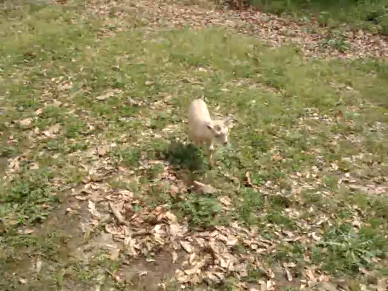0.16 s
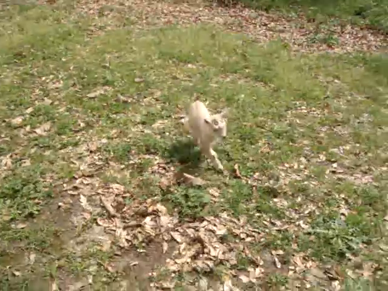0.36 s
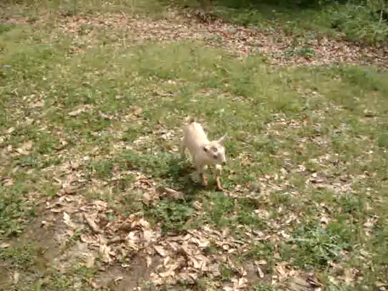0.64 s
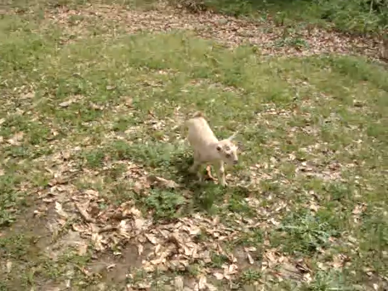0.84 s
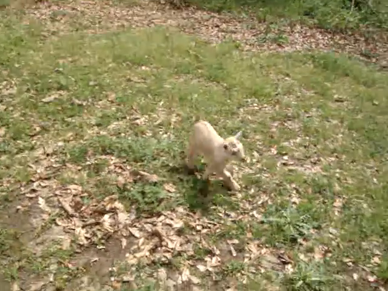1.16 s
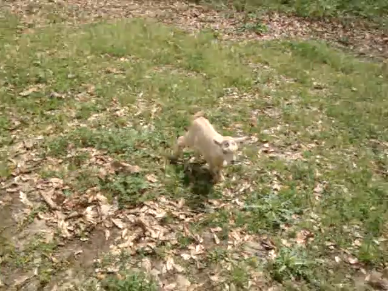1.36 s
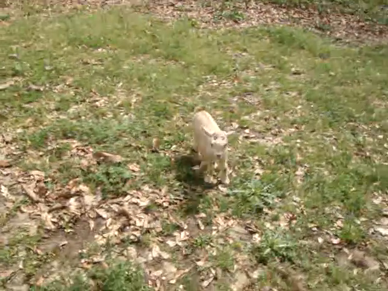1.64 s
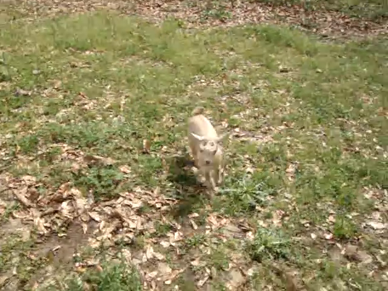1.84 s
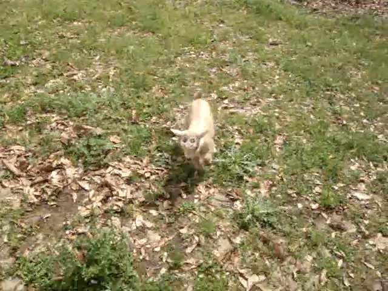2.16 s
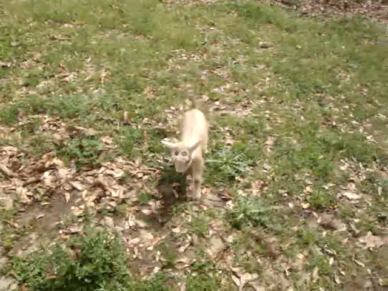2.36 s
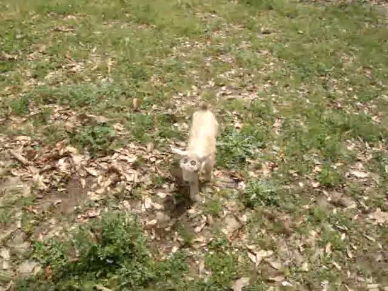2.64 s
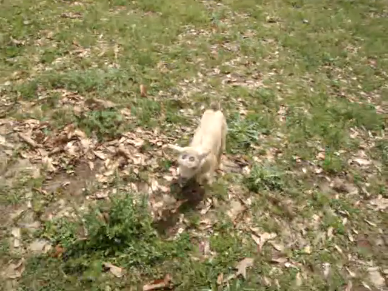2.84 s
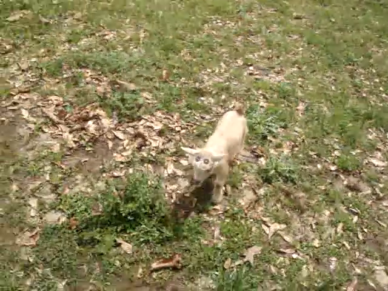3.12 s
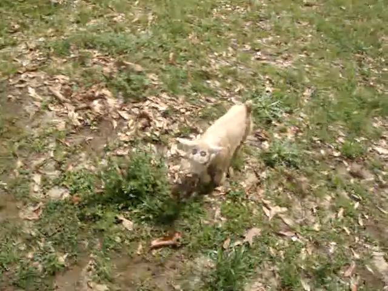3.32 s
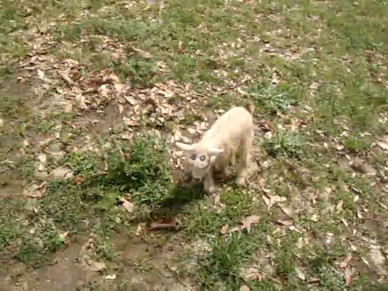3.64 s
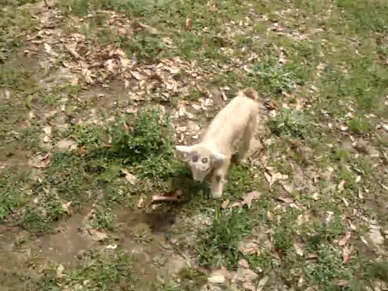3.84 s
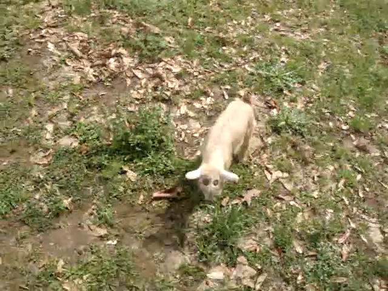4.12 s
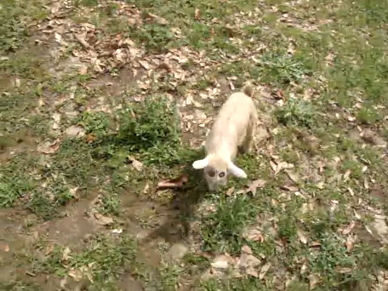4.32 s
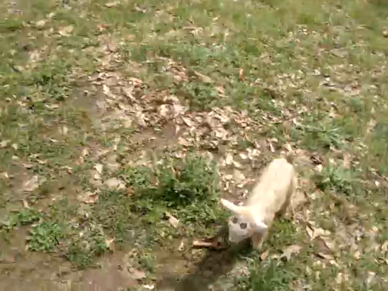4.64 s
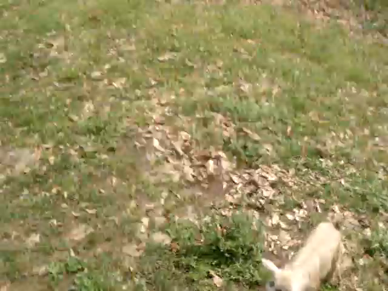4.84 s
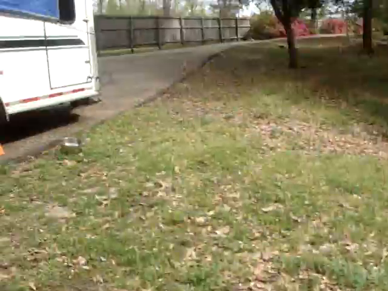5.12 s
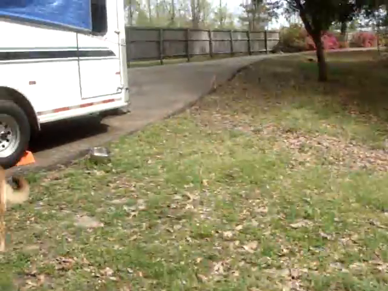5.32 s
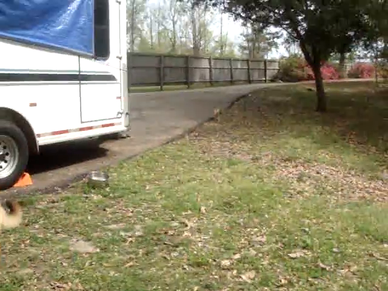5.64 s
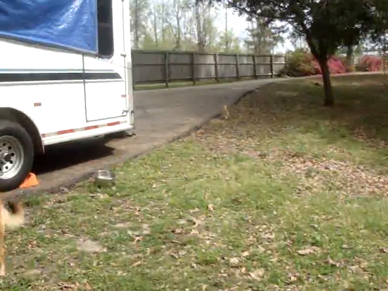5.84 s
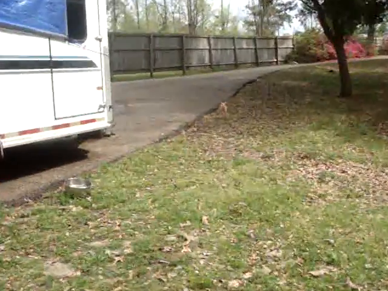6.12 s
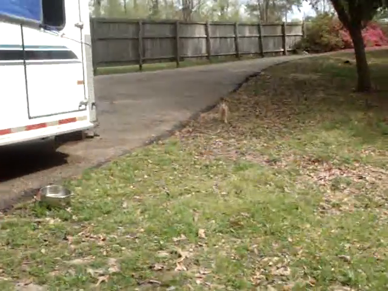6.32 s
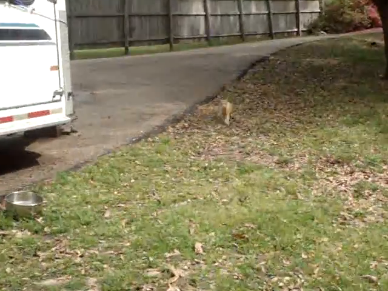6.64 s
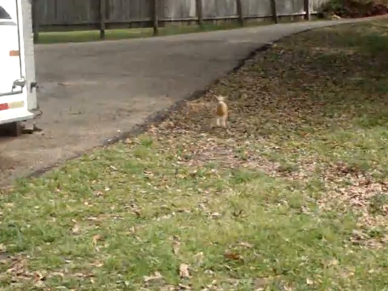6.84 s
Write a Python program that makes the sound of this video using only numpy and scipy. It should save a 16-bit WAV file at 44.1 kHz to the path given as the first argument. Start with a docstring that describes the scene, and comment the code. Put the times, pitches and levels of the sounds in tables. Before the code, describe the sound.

Outdoor yard with light hiss: small hooves crackle leaves, a rooster gives one raspy crow, a songbird whistles repeatedly, another rooster answers faintly far away.

```python
"""A farmyard heard through a camera's microphone: outdoor air, a distant engine of two partials, pulsing hiss.
From the start a goat kid steps through dry leaves close by (tiny cracks and snaps of filtered noise)
and a songbird gives stray whistled notes. Then a rooster crows once: harmonics torn by rasp and flutter.
The songbird whistles slurred notes, then a falling run, each thrown back by the yard (sweeping sines).
Near the end a second rooster answers from far off, as one wavering partial with faint overtones."""
import sys
import numpy as np
from scipy import signal
from scipy.fft import rfft, irfft, next_fast_len
from scipy.io import wavfile

SR = 44100
rng = np.random.default_rng(int(sys.argv[2]) if len(sys.argv) > 2 else 0)


def generate_wav(sig):
    """Save sig (samples, or channels by samples) to the path in sys.argv[1] as 16-bit PCM at SR."""
    pcm = np.round(np.clip(np.atleast_2d(sig).T, -1, 1) * 32767).astype(np.int16)
    wavfile.write(sys.argv[1], SR, pcm)


N = 307818
TIME = np.arange(N) / SR
EDGE_HZ = 10150  # upper band limit of the camera
CLEAN_DEPTH = 0.19  # flutter depth, 0-1, of the rooster's settled voice


def gain_of(db):
    """Decibels to gain."""
    return 10 ** (np.asarray(db) / 20)


def evened(x):
    """Scales to rms 1."""
    return x / np.sqrt(np.mean(abs(x) ** 2) + 1e-20)


def read(points, hz):
    """Reads a table at the frequencies hz, joined on a log-frequency axis."""
    f, value = np.transpose(points)
    return np.interp(np.log(hz + 1), np.log(f + 1), value)


def follow(rows, t):
    """Each column of a curve table at the times t."""
    s, *columns = np.transpose(rows)
    return [np.interp(t, s, column) for column in columns]


def add(mix, s, sound):
    """Mixes a sound in at s seconds, cutting whatever falls outside."""
    start = round(s * SR)
    sound = sound[max(-start, 0):]
    part = mix[max(start, 0):][:len(sound)]
    part += sound[:len(part)]


def coloured(x, points):
    """Filters x by a spectrum table, then scales it to rms 1."""
    hz = np.fft.rfftfreq(len(x), 1 / SR)
    return evened(irfft(rfft(x) * gain_of(read(points, hz)), len(x)))


def wander(size, hz):
    """Smooth random drift of about rms 1, with up to about hz changes a second."""
    length = next_fast_len(max(size, SR))
    f = np.fft.rfftfreq(length, 1 / SR)
    spectrum = rfft(rng.standard_normal(length)) / (1 + (f / hz) ** 4)
    return evened(irfft(spectrum, length))[:size]


def faded(t, fade):
    """A gate over the times t with soft ends, fade seconds each."""
    return np.clip(np.minimum(t - t[0], t[-1] - t) / fade, 0, 1)


def ramp(t, middle, length):
    """Goes from 0 to 1 over the given length."""
    return np.clip((t - middle) / length + .5, 0, 1)


def bell(t, middle, length):
    """A smooth bump of height 1."""
    return np.exp(-(2 * (t - middle) / length) ** 2)


def outdoor_air():
    """Broad outdoor noise whose level swells a little at random."""
    # Each row: frequency in Hz, relative density in dB per Hz.
    air_spectrum = [(15, -61.5), (25, -15), (90, -4), (172, 0.5), (499, 0), (666, -2), (1880, -6.5),
                    (3280, -6.5), (5710, -11.5), (7440, -12.5), (8000, -8), (10400, -51.5), (17600, -120)]
    level_db, swell_db = -50.5, 0.7
    swell = gain_of(level_db + swell_db * wander(N, 3.2))
    return swell * coloured(rng.standard_normal(N), air_spectrum)


def distant_engine():
    """Two low partials share an uneven turning speed and waver separately in level."""
    # Level over time. Each row: time in seconds, relative level in dB.
    engine_level = [(0, -81), (1, -59.5), (4.7, -67), (5.1, -56.5), (5.5, -59.5), (6.3, -49.5), (6.98, -56)]
    # Partials of the drone. Each row: mean frequency in Hz, mean relative level in dB.
    engine_lines = [(91.5, -16), (183, -5.5)]
    turns = np.cumsum(1 + 0.0051 * wander(N, 5.5)) / SR
    drone = np.zeros(N)
    for hz, db in engine_lines:
        drone += gain_of(db + 2.1 * wander(N, 3.3)) * np.sin(2 * np.pi * hz * turns)
    return np.sqrt(2) * gain_of(follow(engine_level, TIME)[0]) * drone


def leaves(cracks_per_s=2500, spread_db=3.0):
    """Steps crush a mass of tiny cracks out of dry leaves, and a few sharp snaps."""
    # Spectrum of the crackle. Each row: frequency in Hz, relative density in dB per Hz.
    leaf_spectrum = [(300, -37), (1000, -24), (2000, -6.5), (3500, -4), (6000, -4), (10000, -8.5)]
    # Leaves and grass brushed by steps. Each row: start in seconds, length in seconds, level in dB.
    rustles = [(0.414, 0.048, -42), (0.85, 0.089, -49.5), (0.941, 0.18, -46), (1.275, 0.075, -45.5),
               (1.405, 0.11, -44.5), (1.49, 0.27, -45), (2.402, 0.028, -41), (3.163, 0.039, -43),
               (3.678, 0.033, -42.5)]
    # Leaves snapping underfoot. Each row: start in seconds, peak level in dB, nominal centre in Hz.
    snaps = [(0.319, -28, 8660), (0.456, -19.5, 2900), (0.469, -21.5, 7120), (0.48, -20.5, 8620),
             (0.862, -26, 4860), (0.876, -21, 5000), (1.023, -30, 3070), (1.26, -25, 2920),
             (1.481, -27, 2970), (4.58, -25.5, 7700), (5.653, -29.5, 1440), (6.791, -27, 3340)]
    snap_decay_s, crumble_decay_s, crumble_db = 0.0012, 0.01, -22  # a snap leaves a faint crumbling

    sizes = gain_of(spread_db * np.minimum(rng.exponential(1, N), 4))
    cracks = sizes * (rng.random(N) < cracks_per_s / SR)
    crackle = coloured(cracks * rng.choice([-1, 1], N), leaf_spectrum)
    pressure, out = np.zeros(N), np.zeros(N)
    for s, length, db in rustles:
        add(pressure, s, gain_of(db) * signal.windows.tukey(int(length * SR), .5))

    t = np.arange(2048) / SR
    decay = np.exp(-t / snap_decay_s) + gain_of(crumble_db) * np.exp(-t / crumble_decay_s)
    for s, db, hz in snaps:
        band = signal.butter(2, [hz * 0.43, min(hz * 2.17, EDGE_HZ)], "band", fs=SR)
        snap = signal.lfilter(*band, rng.standard_normal(len(t)) * decay)
        add(out, s, gain_of(db) * snap / abs(snap).max())
    return out + pressure * crackle


def yard(x, wet_db, early=3.4, early_decay=0.0039):
    """Leaves and fences scatter a quick spray of echoes and a thin tail, each band dying at its own speed."""
    # Each row: frequency in Hz, time in seconds for the tail to fall by 60 dB.
    decay_times = [(300, 0.89), (1300, 1.07), (3500, 0.67), (9000, 0.41)]
    t = TIME[:SR]
    taps = rng.standard_normal(SR) * (rng.random(SR) < 2000 / SR)  # about 2000 echoes a second
    taps = taps * (1 + early * np.exp(-t / early_decay))
    hz, t, bands = signal.stft(taps, SR, nperseg=256)
    decay = gain_of(-60 * t / read(decay_times, hz)[:, None])
    tail = signal.istft(bands * decay, SR, nperseg=256)[1]
    return x + gain_of(wet_db) * signal.fftconvolve(x, tail / np.linalg.norm(tail))[:N]


def far_rooster(rows, overtone_db=-10):
    """Distance leaves one wavering partial and traces of its overtones."""
    t = np.arange(rows[0][0], rows[-1][0], 1 / SR)
    hz, db = follow(rows, t)
    phase = 2 * np.pi * np.cumsum(hz * (1 + 0.0042 * wander(len(t), 60))) / SR
    voice = sum(gain_of(overtone_db * (k - 1)) * np.sin(k * phase) for k in range(1, 4))
    return t[0], np.sqrt(2) * gain_of(db) * voice * faded(t, 0.018)


def songbird():
    """Slightly unsteady whistles follow their note shapes; hard surfaces repeat each sweep."""
    # Five note shapes. Each row: seconds from the note's time, pitch in Hz, relative level in dB.
    slur_shape = [(-.125, 1708, -23), (-.07, 1899, -12), (-.025, 2130, -12.5), (-.005, 2318, -20.5),
                  (0, 3900, -33), (.008, 3650, -3.5), (.03, 3600, -15), (.05, 3156, -4), (.064, 2750, -23)]
    rise_shape = [(-.08, 1293, -19.5), (-.04, 1493, -19.5), (.03, 1870, -24)]
    fall_shape = [(.01, 6900, -19), (.03, 5600, -10), (.054, 4500, -4), (.066, 3400, 2), (.077, 2400, -4),
                  (.084, 2000, -16)]
    chip_shape = [(0, 8130, -1), (.008, 7500, -4), (.017, 6750, 6.5), (.028, 6380, -10)]
    peep_shape = [(0, 3250, -12), (.014, 2916, 0.5), (.08, 2780, -13)]
    # When the slurs, chips and peeps sound. Each row: time in seconds, relative level in dB.
    slurs = [(3.62, -48.5), (4.126, -41), (4.423, -39.5), (4.743, -39.5), (5.032, -37.5)]
    chips = [(1.974, -48), (4.992, -58), (5.248, -47.5)]
    peeps = [(.8, -54.5)]
    # Evenly paced falling notes. Each row: first note in seconds, count of notes, relative level in dB.
    fall_runs = [(.062, 1, -47.5), (5.251, 7, -43.5)]
    # Repeats from hard surfaces. Each row: delay in seconds, level against the direct song in dB.
    echoes = [(.005, -3), (.012, -6), (.038, -4)]
    fall_period_s = 0.2388

    falls = []
    for first, count, run_db in fall_runs:
        falls += [(first + k * fall_period_s, run_db) for k in range(count)]
    # a soft rise leads in each falling note
    phrases = ((slur_shape, slurs), (rise_shape, falls), (fall_shape, falls),
               (chip_shape, chips), (peep_shape, peeps))
    song = np.zeros(N)
    for shape, notes in phrases:
        t = np.arange(shape[0][0], shape[-1][0], 1 / SR)
        hz, db = follow(shape, t)
        for s, level_db in notes:
            unsteady_hz = hz * (1 + 0.011 * wander(len(t), 200))
            whistle = np.sin(2 * np.pi * np.cumsum(unsteady_hz) / SR)
            add(song, s + t[0], np.sqrt(2) * gain_of(level_db + db) * whistle * faded(t, 0.00067))
    heard = song.copy()
    for delay, db in echoes:
        add(heard, delay, gain_of(db) * song)
    return heard


def syrinx(t, hz, rasp, levels, flutter=0):
    """Harmonics that flutter and are smeared by rasp, with puffs of torn air; gives the voice and its phase."""
    # Air torn by uneven cycles. Each row: frequency in Hz, relative density in dB per Hz.
    torn_spectrum = [(350, -17), (600, -13), (1200, 4.5), (1900, -5), (2300, -16.5), (2900, -10),
                     (4500, -19.5), (9000, -18)]
    # upper harmonics: level, fall per harmonic number and slow unevenness, all in dB
    upper_db, upper_slope_db, upper_patchy_db = -5, 1.0, 4
    fundamental_flutter = 0.63  # share of the flutter that reaches the fundamental's level

    size = len(t)
    rasp, flutter = np.clip(rasp, 0, 1), np.clip(flutter, 0, 1)
    shake = 2 * np.pi * np.cumsum(31 + 8 * wander(size, 27.0)) / SR  # about 31 Hz
    vibrato = 0.02 * flutter * np.sin(shake)
    jitter = (0.0017 + 0.045 * rasp) * wander(size, 130)
    phase = 2 * np.pi * np.cumsum(hz * (1 + vibrato + jitter)) / SR
    voice = np.zeros(size)
    for k in range(1, 14):
        if k <= len(levels):
            gain = gain_of(levels[k - 1])
        else:  # weak, patchy upper harmonics
            patches = upper_patchy_db * wander(size, 13)
            gain = gain_of(np.minimum(*levels[-2:]) + upper_db - upper_slope_db * k + patches)
        depth = flutter * (fundamental_flutter if k == 1 else 1)
        throb = evened(1 + depth * np.cos(shake + k * np.pi / 2 + wander(size, 19)))
        scatter = evened(wander(size, 130) + 1j * wander(size, 170))  # uneven cycles smear each line
        voice += gain * throb * ((1 + 0.78 * rasp * scatter) * np.exp(1j * k * phase)).real
    torn_air = coloured(rng.standard_normal(size) * (1 + np.cos(phase)), torn_spectrum)  # one puff a cycle
    return voice + gain_of(np.max(levels, axis=0) - 0.5) * rasp * torn_air, phase


def short_syllable(leap_at, lead_s, hold_s, release_s, db):
    """Starts low, leaps up with a rasp, arches and dies away, while the syrinx's other side stays low."""
    # Harmonics 1-4. Each row: relative level in dB, change in the low register in dB, release in dB per s.
    syllable_harmonics = [(-2, -8, 180), (-1, -3.5, 48), (-16, 0, 90), (-25.5, -7, 90)]
    # The side that stays low. Each row: mean frequency in Hz, relative level in dB.
    low_lines = [(1065, -12), (1835, -15.5)]
    low_release_db_per_s = 68
    low_hz, high_hz, arch_hz, leap_s = 521.3, 625.3, 26.94, 0.013
    rasp_low, rasp_ends, rasp_middle = 0.3, 0.42, 0.24  # 0-1; the rasp clears in mid-hold

    t = np.arange(-lead_s, hold_s + release_s, 1 / SR)
    high = ramp(t, 0, leap_s)
    arch = np.sin(np.pi * np.clip(t / hold_s, 0, 1))
    released = np.maximum(t - hold_s, 0)
    hz = low_hz + high * (high_hz - low_hz) + arch_hz * arch
    rasp = rasp_low + high * (rasp_ends - rasp_low) + arch * (rasp_middle - rasp_ends)
    levels = [db + own_db + low_db * (1 - high) - fall * released
              for own_db, low_db, fall in syllable_harmonics]
    voice, _ = syrinx(t, hz, rasp, levels)
    low_phase = 2 * np.pi * np.cumsum(1 + 0.017 * wander(len(t), 110)) / SR
    low_side = sum(gain_of(line_db) * np.cos(line_hz * low_phase) for line_hz, line_db in low_lines)
    return leap_at + t, voice + gain_of(db - low_release_db_per_s * released) * low_side


def long_note():
    """Breaks in with a rasp, flutters, then holds a clean tone out of which single overtones ring."""
    # Pitch. Each row: time in seconds, frequency in Hz.
    note_pitch = [(2.228, 566), (2.253, 653), (2.302, 688.5), (2.502, 662), (2.7, 663.4), (2.75, 637.4),
                  (2.9, 658.3), (3.3, 657), (3.602, 643.4), (3.777, 614.5)]
    # Fundamental, then the second harmonic, which carries the crow. Each row: time in seconds, level in dB.
    first_level = [(2.23, -48), (2.238, -39), (2.744, -33), (2.796, -39), (3.156, -41), (3.25, -52),
                   (3.332, -45), (3.396, -53), (3.576, -40.5), (3.64, -50), (3.744, -35.5), (3.77, -36)]
    second_level = [(2.23, -42), (2.336, -31), (2.616, -34), (2.666, -29.5), (2.882, -37), (2.962, -28.5),
                    (3.056, -33), (3.112, -41.5), (3.242, -32.5), (3.314, -38), (3.378, -30.5), (3.46, -39),
                    (3.534, -27.5), (3.594, -45), (3.64, -49), (3.678, -24.5), (3.77, -34)]
    # Harmonics 3 and 4 sink steadily. Each row: starting level in dB, fall in dB per second.
    upper_levels = [(-49.5, 8.5), (-52.5, 5.5)]
    # Overtones that the throat picks out for a moment, each at the harmonic nearest its frequency.
    # Each row: middle in seconds, length in seconds, nominal frequency in Hz, peak level in dB.
    overtones = [(2.365, 0.14, 2720, -58.5), (2.545, .3, 8020, -59), (2.95, 0.36, 6580, -53),
                 (3.1, 0.44, 2630, -46), (3.423, 0.18, 4560, -47), (3.61, .13, 5790, -55)]
    onset_rasp, onset_rasp_s, flutter_rasp, clean_rasp = 0.627, 0.033, 0.085, 0.028
    flutter_depth, settle_at_s, settle_s = 0.65, 2.85, 0.1

    t = np.arange(note_pitch[0][0], note_pitch[-1][0], 1 / SR)
    age = t - t[0]
    unsettled = 1 - ramp(t, settle_at_s, settle_s)
    hz, = follow(note_pitch, t)
    rasp = clean_rasp + flutter_rasp * unsettled + onset_rasp * np.exp(-age / onset_rasp_s)
    flutter = CLEAN_DEPTH + (flutter_depth - CLEAN_DEPTH) * unsettled
    levels = follow(first_level, t) + follow(second_level, t)  # lists joined, one curve a harmonic
    levels += [db - fall * age for db, fall in upper_levels]
    voice, phase = syrinx(t, hz, rasp, levels, flutter)
    for s, length, overtone_hz, db in overtones:
        nearest = round(overtone_hz / np.interp(s, t, hz))
        voice += gain_of(db) * bell(t, s, length) * np.cos(nearest * phase)
    return t, voice


def low_close(side_db=-14):
    """The voice sags through a throat resonance and gives out; alternating cycles add lines between harmonics."""
    # The low register sags. Each row: time in seconds, pitch in Hz, rasp from 0 to 1.
    sag = [(3.755, 549.2, .45), (3.81, 516.7, 0.12), (3.979, 493.7, 0.03), (4.1, 459.5, 0.37),
           (4.202, 456.5, 0.52)]
    # Harmonics 1-4. Each row: level in dB before the resonance, change by the end in dB.
    close_harmonics = [(-40, -19), (-44, -16), (-44, 5), (-57.5, -15)]
    # Strong and weak cycles alternate. Each row: middle in seconds, length in seconds, level in dB.
    doublings = [(3.791, .09, -48), (4.01, 0.071, -38.5)]
    throat_hz, throat_width_hz, throat_db = 1489, 30, 12.5  # a narrow resonance

    t = np.arange(sag[0][0], sag[-1][0], 1 / SR)
    hz, rasp = follow(sag, t)
    spent = np.linspace(0, 1, len(t)) ** 3
    levels = [db + end_db * spent + throat_db * bell(k * hz, throat_hz, throat_width_hz)
              for k, (db, end_db) in enumerate(close_harmonics, 1)]
    voice, phase = syrinx(t, hz, rasp, levels, CLEAN_DEPTH)
    doubling = sum(gain_of(db) * bell(t, s, length) for s, length, db in doublings)
    side_lines = np.cos(3 / 2 * phase) + np.cos(7 / 2 * phase)
    half_lines = np.cos(5 / 2 * phase) + gain_of(side_db) * side_lines
    return t, voice + doubling * half_lines


def rooster():
    """One crow from the syrinx: two short syllables, the long note and the low close."""
    # Each row: leap upwards in seconds, low lead-in in seconds, hold in seconds, release in seconds,
    # relative level in dB.
    syllables = [(1.739, .042, .12, 0.193, -37), (2.057, .028, 0.1036, 0.11, -35)]
    parts = [short_syllable(*row) for row in syllables] + [long_note(), low_close()]
    crow = np.zeros(N)
    for t, voice in parts:
        add(crow, t[0], np.sqrt(2) * voice * faded(t, 0.0095))
    return crow


def scene():
    """Air and engine behind, steps close by, and birds across the yard."""
    # Two parts of the far crow. Each row: time in seconds, mean pitch in Hz, relative level in dB.
    far_crow = [
        [(5.75, 896, -65), (5.79, 889, -51.5), (5.84, 940, -71)],
        [(5.9, 978, -59), (6.1, 1041, -60.5), (6.15, 973, -56), (6.21, 1000, -63), (6.29, 953, -55.5)],
    ]
    near_wet_db, far_wet_db, song_wet_db = -12, -8, -3  # level of the yard's tail
    late_echo_s, late_echo_db = 0.16, -18

    near, far = rooster(), np.zeros(N)
    for rows in far_crow:
        add(far, *far_rooster(rows))
    crow = yard(near, near_wet_db)
    late_echo = gain_of(late_echo_db) * yard(near, far_wet_db)
    add(crow, late_echo_s, late_echo)  # the tree line answers late
    birds = crow + gain_of(5.5) * yard(far, far_wet_db) + yard(songbird(), song_wet_db)
    return (birds + leaves() + outdoor_air() + distant_engine())[None]


def record(dry):
    """The camera adds a high hiss that pulses quickly, then limits the band."""
    # Each row: frequency in Hz, relative density in dB per Hz.
    hiss_spectrum = [(7500, -27.5), (8350, -2.5), (8700, 11.5), (9000, -5.5), (9200, 7.5), (9450, 5),
                     (9700, 1.5), (10100, -13)]
    hiss_db, pulse_hz, pulse_db = -50.5, 64.45, 2.2
    pulse = evened(gain_of(pulse_db * np.cos(2 * np.pi * pulse_hz * TIME)))
    hiss = coloured(rng.standard_normal(N), [(5000, -59.0)] + hiss_spectrum)  # almost none at 5 kHz
    x = dry + gain_of(hiss_db) * pulse * hiss
    band_limit = signal.firwin(801, EDGE_HZ, window=("kaiser", 9), fs=SR)
    return signal.oaconvolve(x, band_limit[None], "same")


dry = scene()
out = record(dry)
generate_wav(out)
```